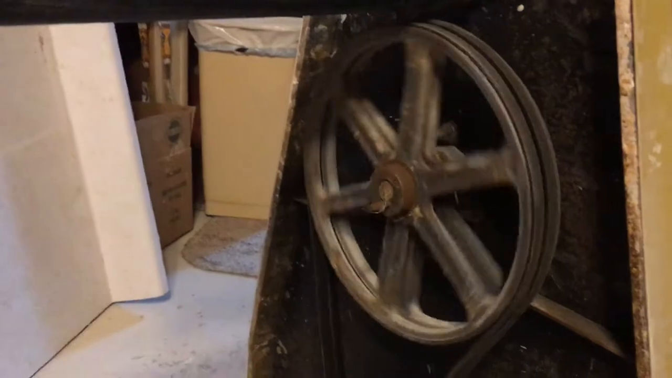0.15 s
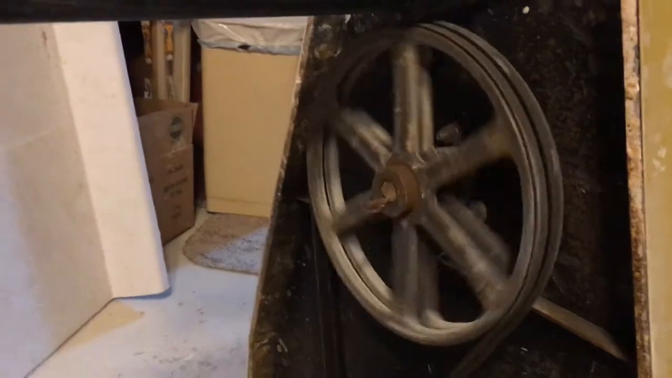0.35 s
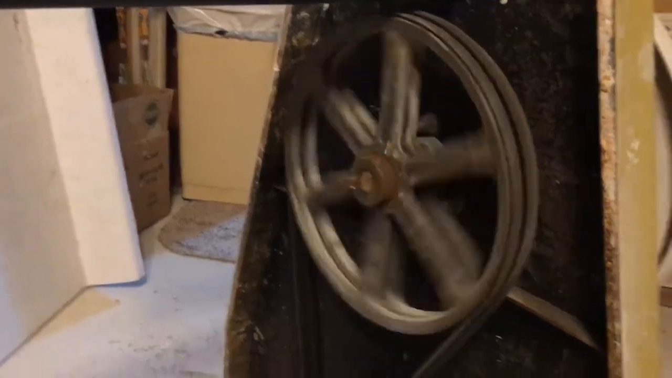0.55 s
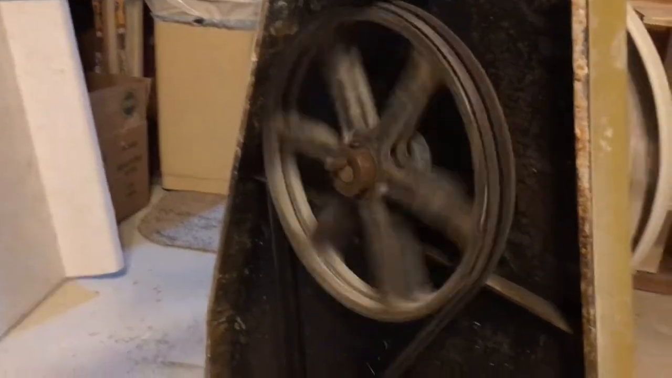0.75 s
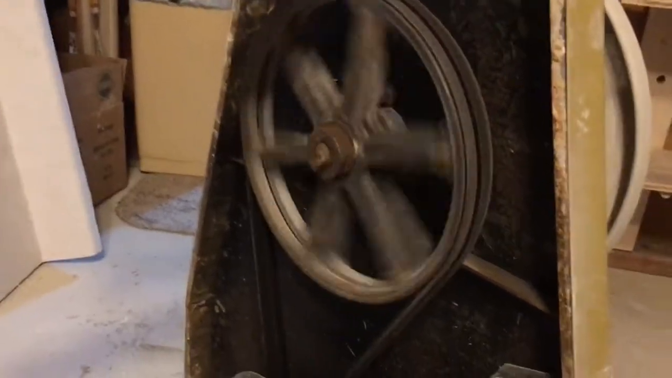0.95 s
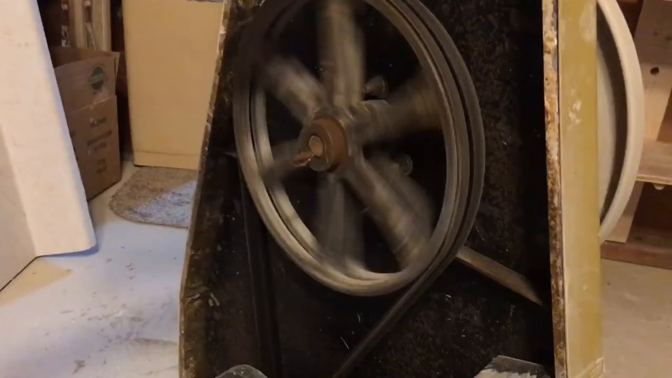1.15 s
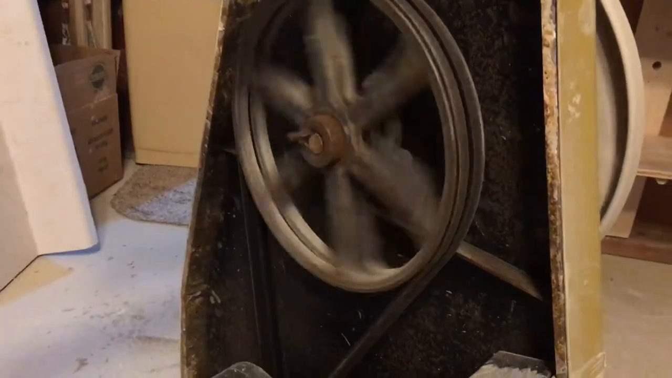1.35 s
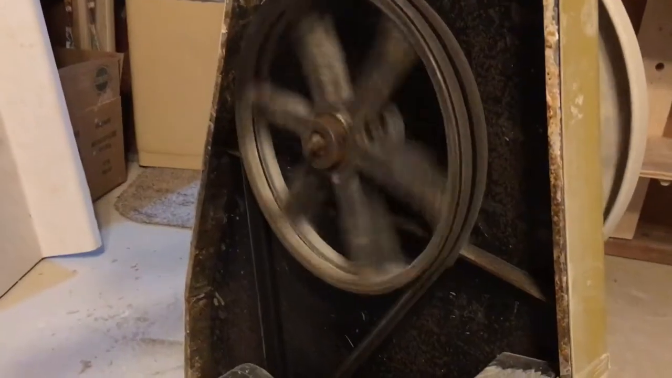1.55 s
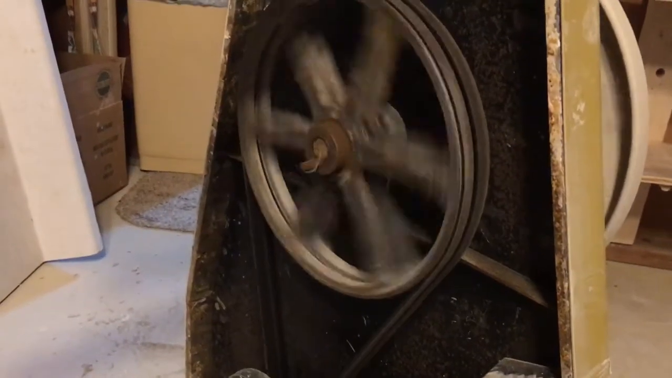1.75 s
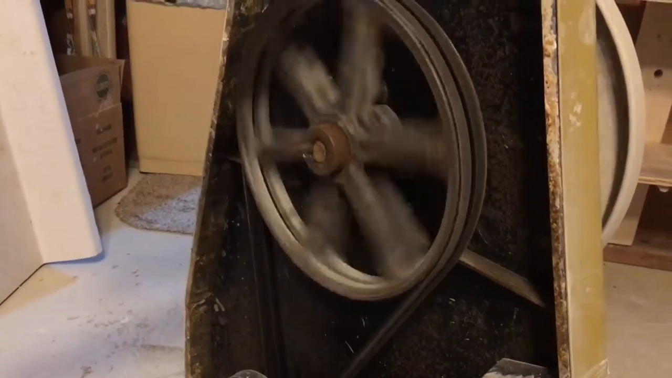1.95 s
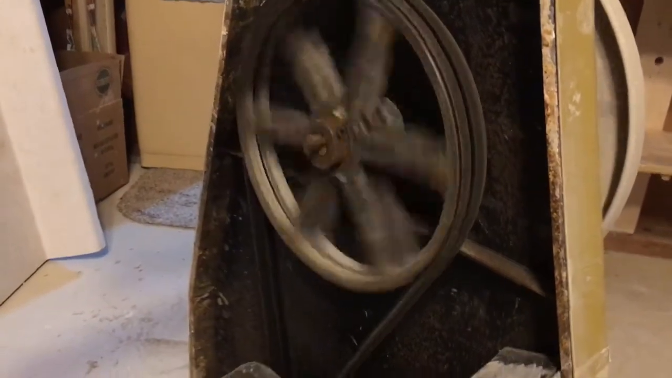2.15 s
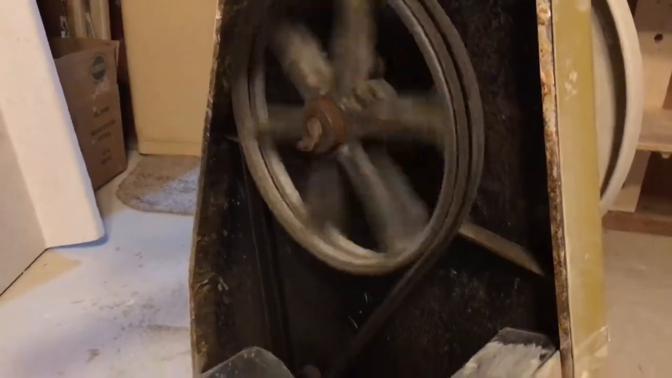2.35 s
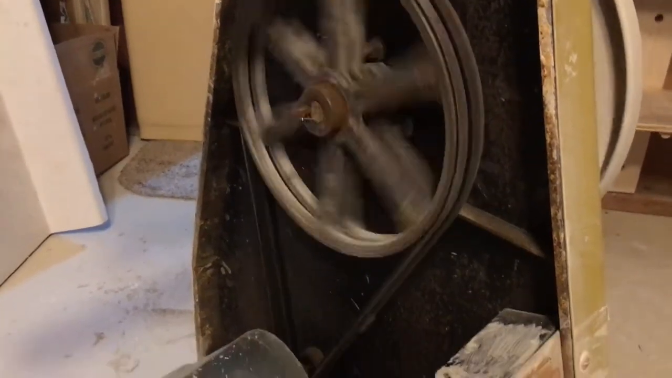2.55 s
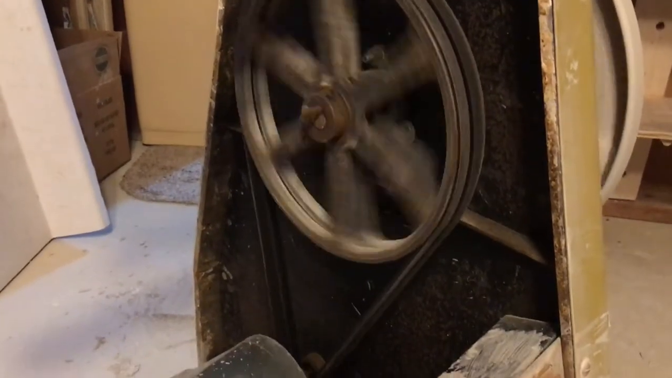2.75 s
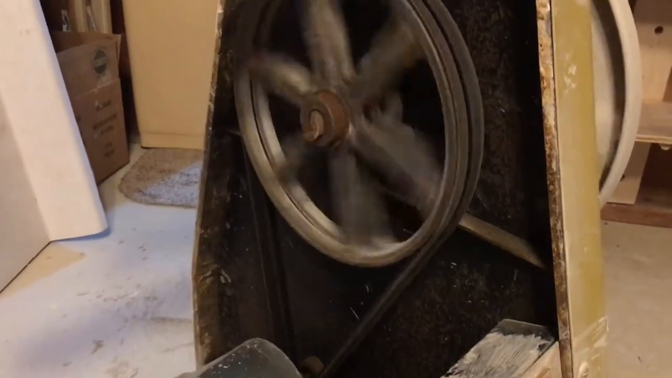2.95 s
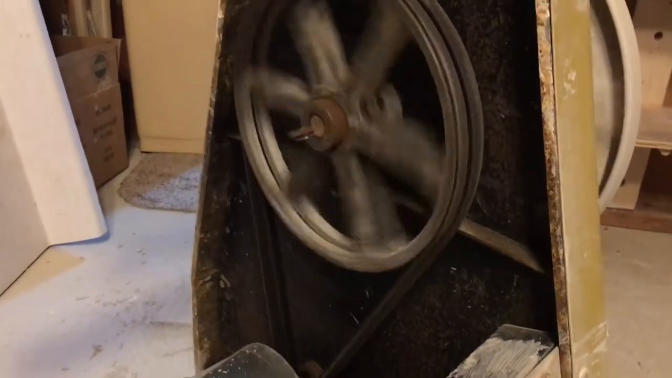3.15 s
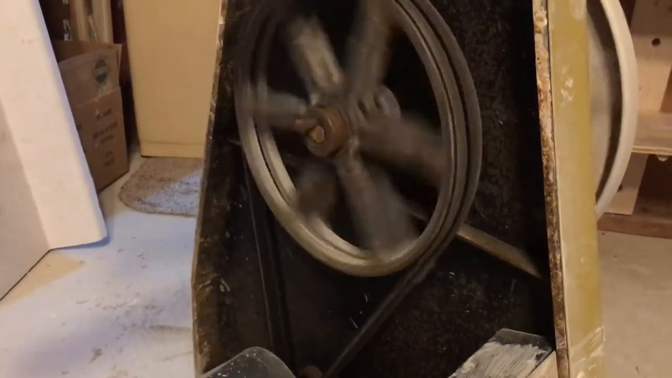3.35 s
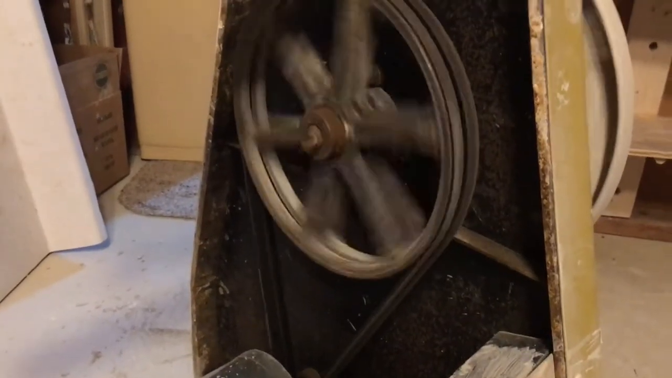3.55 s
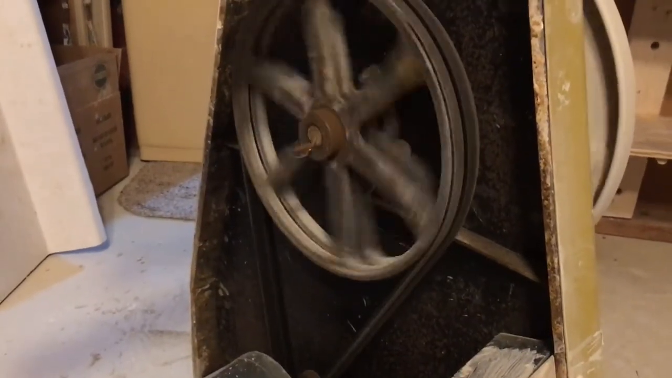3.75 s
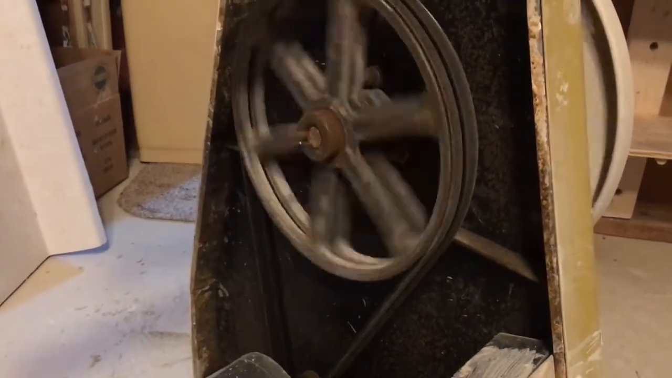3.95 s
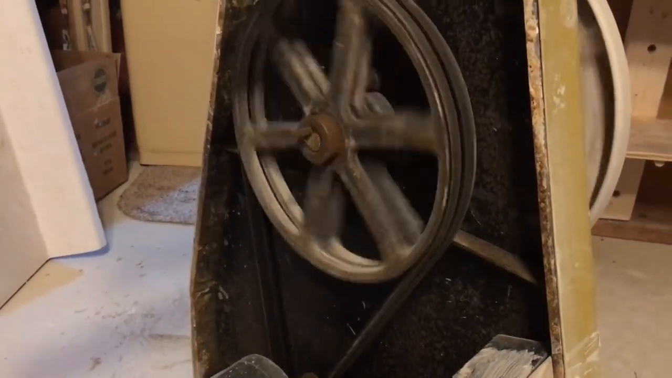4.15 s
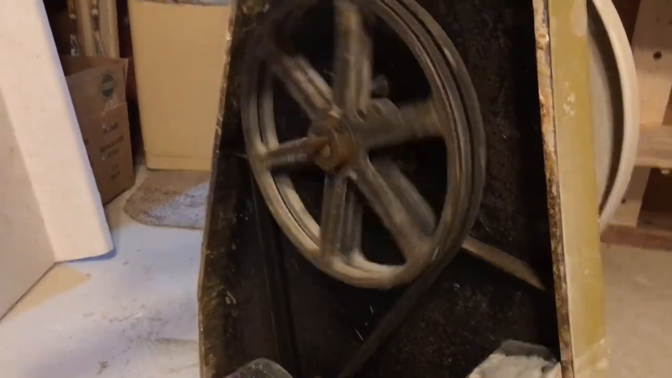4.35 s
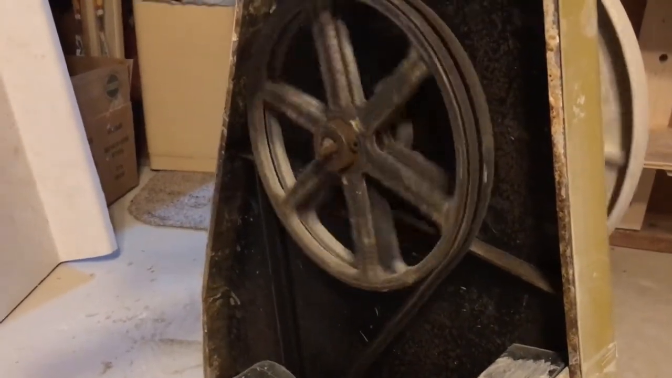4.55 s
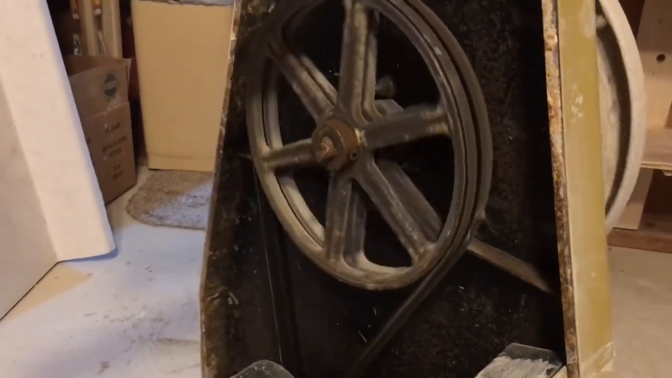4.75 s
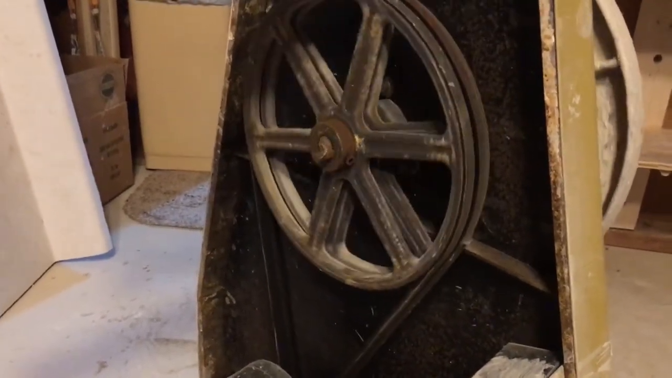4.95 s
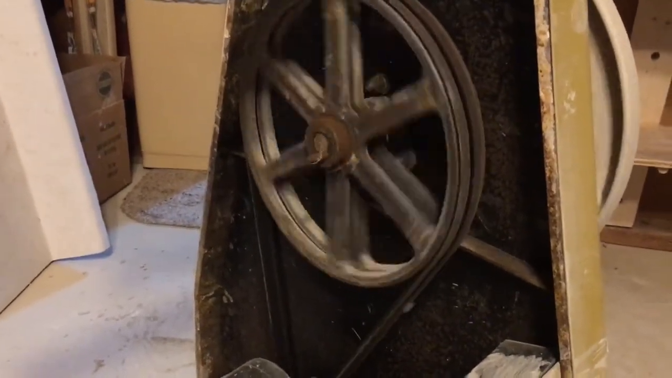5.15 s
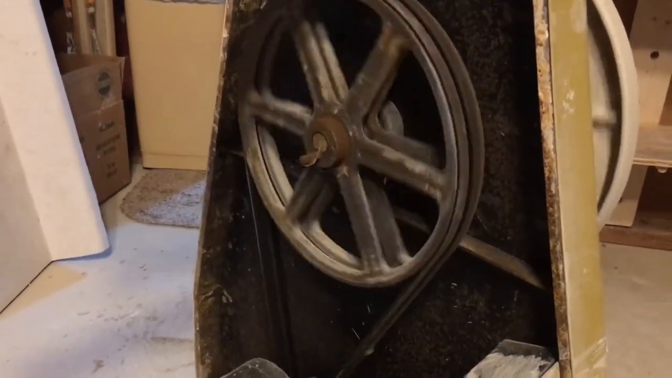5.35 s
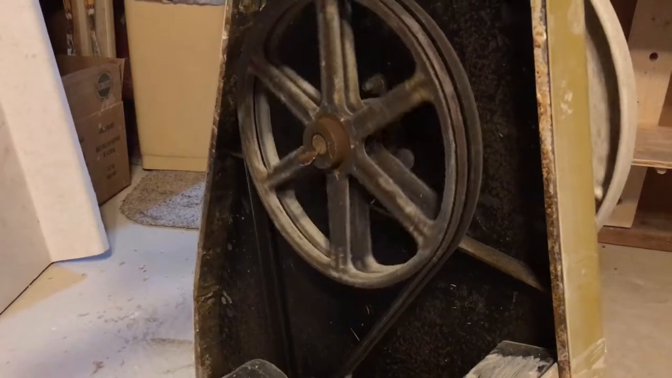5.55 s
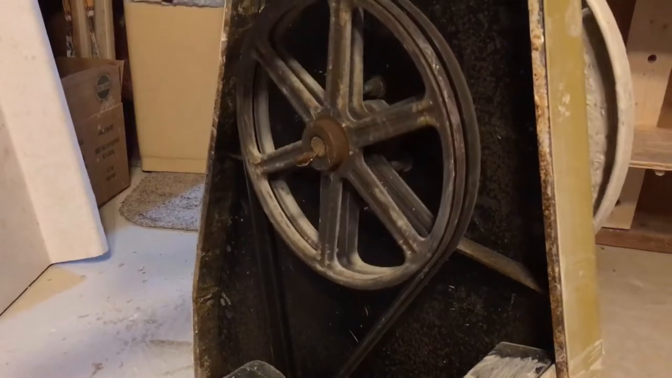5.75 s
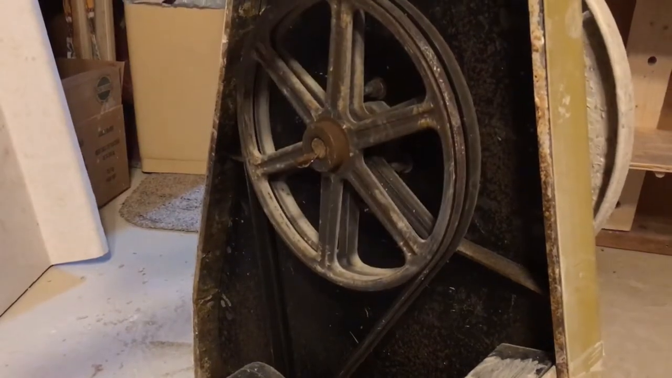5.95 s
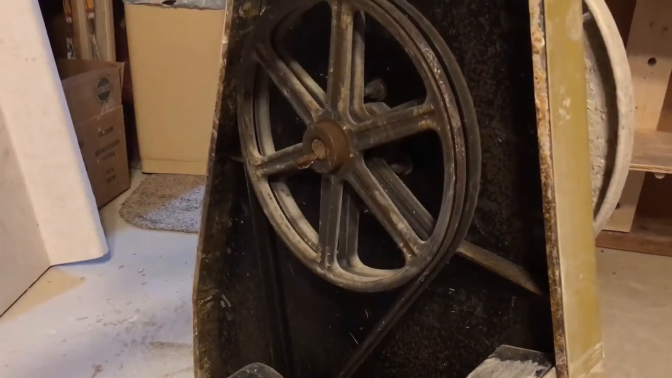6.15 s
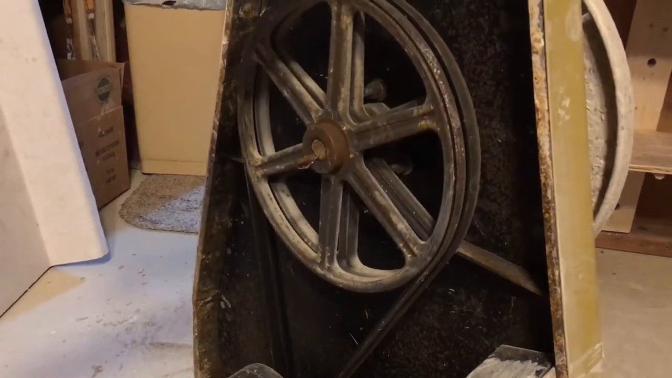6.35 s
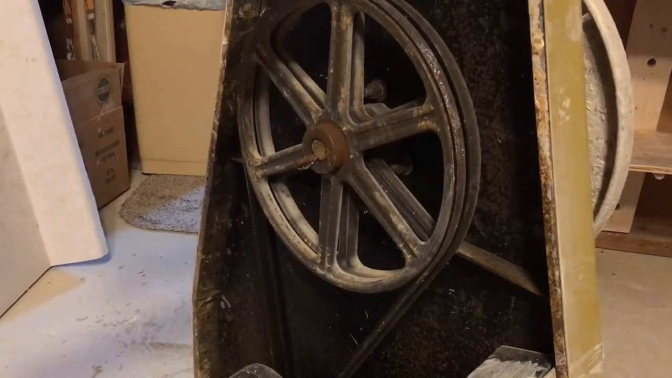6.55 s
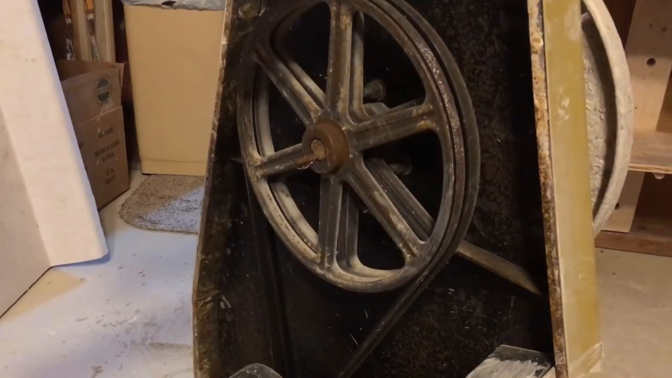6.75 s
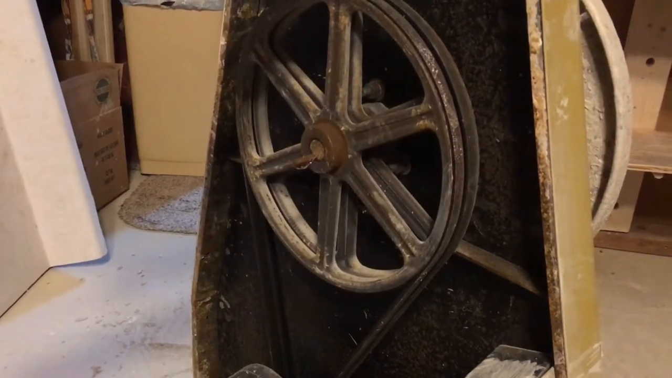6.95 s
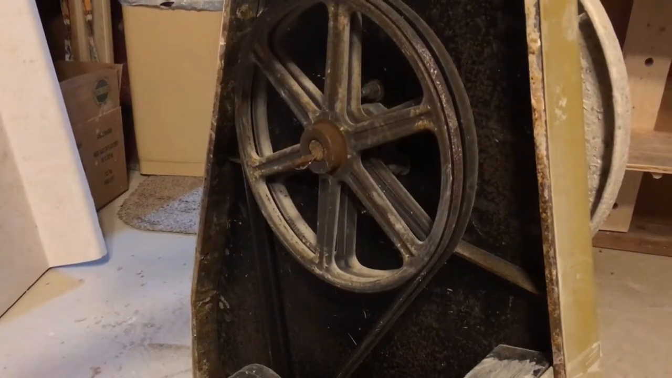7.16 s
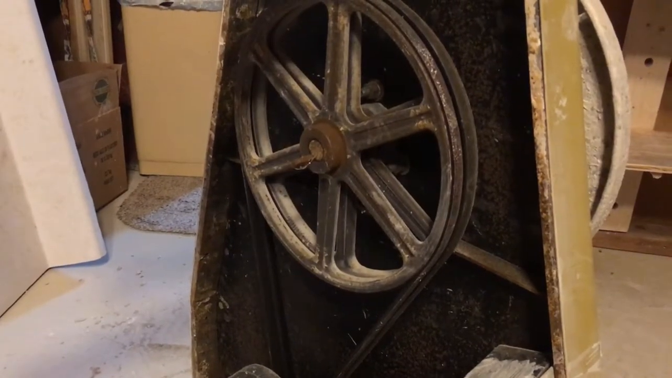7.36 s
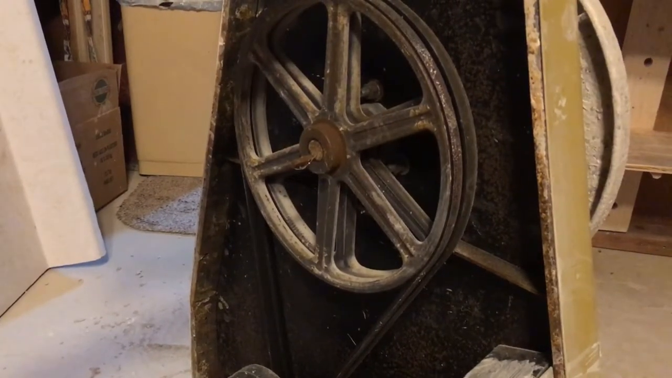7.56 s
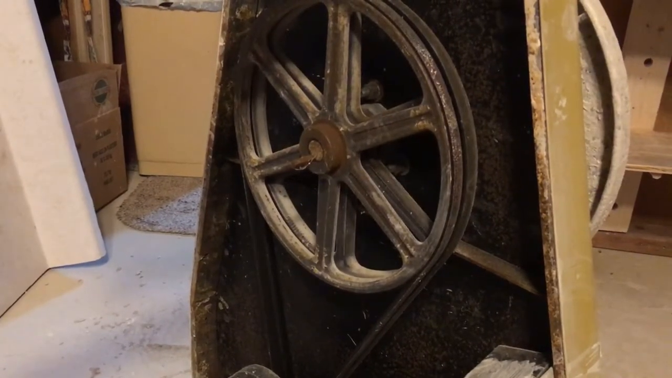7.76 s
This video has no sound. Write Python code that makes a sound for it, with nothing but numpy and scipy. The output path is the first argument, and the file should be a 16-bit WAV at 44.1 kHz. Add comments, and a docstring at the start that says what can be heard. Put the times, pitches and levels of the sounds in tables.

```python
"""The belt drive of a pottery wheel, close to a single microphone in a small workshop.
The motor hums on the mains and runs up; its shaft whines, its bearings rattle, and the rubber belt
chirps, squeaks and swishes once a wheel turn. The power is cut and the drive coasts to rest.
A lever twice slams against the steel frame and sets it ringing, with light taps of the linkage between.
Behind it all lies the room tone, a low rumble of ventilation."""
import sys
import numpy as np
from scipy import signal
from scipy.fft import rfft, irfft, next_fast_len
from scipy.io import wavfile

SR = 44100
rng = np.random.default_rng(int(sys.argv[2]) if len(sys.argv) > 2 else 0)


def wrap_up_sound(samples):
    """Save the sound to the file named by the first command line argument, as 16-bit audio."""
    columns = np.atleast_2d(samples).T
    # keep every value between -1 and 1, then stretch to whole-number steps
    tamed = np.clip(columns, -1, 1)
    steps = np.round(tamed * 32767).astype(np.int16)
    wavfile.write(sys.argv[1], SR, steps)


N = 347949
TIME = np.arange(N) / SR

# Room tone of the workshop. Each row: frequency in Hz, relative level in dB.
ROOM_SPECTRUM = [(30, -15), (42, -9), (51, -7), (62, -3.5), (85, -11.5), (125, -8), (174, -16.5),
                 (260, -15), (290, -27), (376, -21.5), (496, -33.5), (1040, -39.5), (4000, -55),
                 (16000, -62.5)]
# Light taps of the linkage. Each row: start in seconds, thump level in dB, tick level in dB.
LINKAGE_TAPS = [(5.19, -36, -65), (5.748, -42.5, -78), (7.078, -48, -78), (7.249, -41.5, -57),
                (7.7, -42.5, -66.5)]
# Low, damped resonances of the frame. Each row: centre in Hz, width in Hz, relative level in dB.
THUMP_MODES = [(366, 56, 4.5), (590, 160, -13.5)]
# The lever hits the frame. Each row: start in seconds, then thud, clang and crack strength in dB.
LEVER_CONTACTS = [(5.0638, -21.5, -13, -14), (5.072, -16.5, -11.5, -45), (5.078, -22.5, -15, -27),
                  (5.092, -21.5, -29.5, -25), (5.11, -32, -22, -35), (7.846, -27, -33, -27.5),
                  (7.857, -19, -20, -41.5), (7.863, -30, -35, -28), (7.88, -22.5, -22, -42)]
# Modes of the steel frame. Each row: frequency in Hz, relative level in dB, seconds to fall 60 dB.
FRAME_MODES = [(78, -7.5, 0.51), (112, -7, 0.34), (200.4, -13, 0.47), (275.4, -16.5, 0.24),
               (337.6, -2.5, 0.31), (401.5, 4, 0.29), (457, 4.5, 0.16), (628, -20, .3), (812, -7.5, 0.17),
               (884, -14, 0.4), (1205, -21.5, 0.28), (1510, -4, 0.22), (1549, 2.5, 0.22), (1595, 1, .18),
               (1726, -8, 0.26), (1755, -8.5, 0.33), (1927, -12.5, .18), (2118, -6.5, 0.22),
               (2216, -16, .22), (2697, -8.5, 0.19), (3009, -10.5, 0.15), (3560, -8.5, .14),
               (3650, -12, 0.19), (3790, -17, .17), (4102, -22.5, 0.28), (4430, -24, 0.15),
               (4620, -23, 0.25), (4872, -22.5, 0.18), (5524, -11.5, 0.09), (8090, -14.5, 0.11)]
# Dense ring of sheet metal and room. Each row: frequency in Hz, band gain in dB, seconds to fall 60 dB.
CLATTER_BANDS = [(75, -15, 0.35), (150.9, -22, 0.71), (410, -18.5, 0.48), (710, -21, 0.34),
                 (1050, -26, 0.19), (1664, -10.5, 0.24), (2382, -23, .24), (3640, -14, 0.18),
                 (4490, -21.5, .22), (5380, -18, 0.23), (7000, -29.5, 0.15), (8300, -21.5, .17),
                 (10600, -28.5, 0.15), (15000, -34, .14)]
# Resonances of the belt's chirp. Each row: centre in Hz, width in Hz, relative level in dB.
CHIRP_MODES = [(1780, 53, 9.5), (2010, 89, -2), (2090, 93, 2)]
# The belt peels loudly from its groove. Each row: start in seconds, relative level in dB.
LOUD_PEELS = [(0.3286, -39.5), (0.7053, -36.5), (1.6995, -35), (2.3191, -37), (2.589, -35), (3.2211, -35),
              (3.503, -39), (4.3784, -50), (5.841, -52)]
# Rubber rubbing on iron. Each row: frequency in Hz, relative level in dB.
RUB_SPECTRUM = [(1000, 2), (2000, 0.5), (4200, 2), (4900, -1.5), (6600, 0.5), (7100, -4.5), (9900, 4.5),
                (10400, -16.5), (11500, -3.5), (13300, -4), (15800, -12)]
# Resonances of the iron pulley. Each row: centre in Hz, width in Hz, relative level in dB.
PULLEY_MODES = [(4380, 150, 0), (5400, 320, 0), (6110, 200, -1.5), (6596, 150, 5), (7550, 350, -3.5),
                (8630, 380, -11), (9440, 670, -2.5), (11530, 620, 2), (14840, 110, -6.5)]
# The motor shaft runs up and coasts down. Each row: time in seconds, speed in turns per second.
SHAFT_SPEED = [(0, 9), (.3, 12.5), (.5, 18), (.7, 23.5), (1.0, 26.5), (1.3, 27.7), (2.0, 28.5),
               (3.56, 28.8), (3.65, 27.6), (3.8, 25), (3.9, 23.3), (4.08, 20), (4.43, 15.6), (5.0, 9),
               (5.85, .5)]
# Whine of the shaft. Each row: multiple of the shaft speed, relative level in dB.
SHAFT_TONES = [(15, 6), (20, -12.5), (22, -10.5), (23, -4.5), (24, 1.5), (30, -10.5), (32, -8.5), (39, -4)]
# The mount's response to the shaft tones. Each row: frequency in Hz, gain in dB.
MOUNT_RESPONSE = [(200, -34.5), (300, -21), (350, -5), (375, 1.5), (405, -18.5), (500, -36), (570, -12),
                  (615, -7.5), (700, -17.5), (790, -5), (920, -10), (1100, -31)]
# Resonances of mount, housing and bearings. Each row: centre in Hz, width in Hz, relative level in dB.
MOUNT_MODES = [(459, 22, -5), (580, 33, 2), (616.2, 20, 6), (688, 45, -6.5), (770, 65, -10),
               (903, 61, -17.5), (1214, 29, -13.5)]
HOUSING_MODES = [(1221.6, 69, -1), (1380, 110, -4.5), (1539, 44, 2.5)]
BEARING_MODES = [(2092, 79, -16), (2294, 62, -12.5), (2716, 27, -11.5), (2980, 42, -2), (3067, 110, -4),
                 (3353, 130, -4.5), (3488, 94, -6.5), (3875, 49, -11.5)]
# Broad rumble of the machine's body. Each row: frequency in Hz, relative level in dB.
BODY_SPECTRUM = [(40, -9.0), (65, 8.5), (100, -1), (200, 1.5), (280, -1), (440, 1.5), (510, -10),
                 (750, -1), (1000, -17.0), (1400, -10.5), (2200, -40.0)]
# Magnetic hum of the motor. Each row: multiple of the mains frequency, relative level in dB.
HUM_HARMONICS = [(2, -16.5), (3, -1.5), (4, -6.5), (5, -4.5), (6, 1), (7, -16.5), (8, -17), (9, -25.5),
                 (10, -29), (11, -27), (13, -25.5), (14, -26.5), (15, -32), (18, -34.5), (19, -41),
                 (20, -35.5)]

MAINS_HZ, POWER_OFF_S = 60, 3.555


def from_db(db):
    """Decibels to gain."""
    return 10 ** (np.asarray(db) / 20)


def unit_rms(x):
    """Scale to unit power."""
    return x / np.sqrt(np.mean(x ** 2) + 1e-20)


def at_hz(table, hz):
    """Columns of a table read on a log-frequency axis."""
    frequencies, *columns = np.transpose(table)
    return [np.interp(np.log(hz + 1e-9), np.log(frequencies), column) for column in columns]


def white():
    """White noise."""
    return rng.standard_normal(N)


def drift(rate_hz):
    """A random wander of spread 1, mostly slower than the given rate."""
    size = next_fast_len(N // 20 + 2)
    hz = np.arange(size // 2 + 1) * SR / 20 / size
    slow = irfft(rfft(rng.standard_normal(size)) / (1 + (hz / rate_hz) ** 2), size)
    return np.interp(np.arange(N) / 20, np.arange(size), unit_rms(slow))


def coloured(x, spectrum):
    """Give a sound a broad spectrum, at unit power."""
    size = next_fast_len(N)
    hz = np.arange(size // 2 + 1) * SR / size
    return unit_rms(irfft(rfft(x, size) * from_db(at_hz(spectrum, hz)[0]), size)[:N])


def resonate(x, modes):
    """Parallel resonances, each applied twice for steep skirts; the sum has unit power."""
    out = 0
    for hz, width, db in modes:
        r = np.exp(-np.pi * width * np.sqrt(2) / SR)
        section = [(1 - r * r) / 2, 0, (r * r - 1) / 2, 1, -2 * r * np.cos(2 * np.pi * hz / SR), r * r]
        out = out + from_db(db) * signal.sosfilt([section, section], x)
    return unit_rms(out)


def ring(clicks, hz, t60):
    """A unit click sets a sine of height 1 ringing."""
    r, w = np.exp(-np.log(1000) / (t60 * SR)), 2 * np.pi * hz / SR
    return signal.lfilter([0, np.sin(w)], [1, -2 * r * np.cos(w), r * r], clicks + 1e-18)


def fade(start_s, t60, rise_s):
    """Silence until the start, then a rounded rise and a decay."""
    age = np.clip(TIME - start_s, 0, 2 * t60)
    return (1 - np.exp(-age / rise_s)) * np.exp(-np.log(1000) * age / t60)


def throb(turns, depth_db):
    """A swell once a turn."""
    return unit_rms(from_db(depth_db * np.cos(2 * np.pi * turns)))


def once_every(turns, first, period, width):
    """A recurring swell of height 1; first peak, period and half width are in shaft turns."""
    away = (turns - first + period / 2) % period - period / 2
    return np.exp(-(away / width) ** 2)


def rolling(turns, pace, repeat):
    """The same rough track is rolled over on every turn, mixed with fresh grit."""
    track = rng.standard_normal(1500)
    place = np.arange(len(track)) / len(track)
    repeating = np.interp(turns % 1, place, track) * np.sqrt(pace)
    return np.sqrt(repeat) * unit_rms(repeating) + np.sqrt(1 - repeat) * white()


def room_tone(rumble_db=-47, drone_db=-50, fan_db=-52.5, fan_hz=41.5):
    """Ventilation rumbles in the background, with a deep fan tone and a drone at twice the mains rate."""
    drone = np.sqrt(2) * np.sin(2 * np.pi * 2 * MAINS_HZ * TIME + 0.45 * drift(2.6))
    drone *= 1 + 0.1 * drift(4.8)
    fan = np.sqrt(2) * np.sin(2 * np.pi * fan_hz * TIME + 0.34 * drift(2))
    rumble = coloured(white(), ROOM_SPECTRUM)
    return from_db(rumble_db) * rumble + from_db(drone_db) * drone + from_db(fan_db) * fan


def linkage_taps():
    """Soft contacts wake the low, well damped part of the frame, each with a faint tick."""
    thump = sum(from_db(db + 4.5) * fade(s, t60=0.14, rise_s=0.0042) for s, db, _ in LINKAGE_TAPS)
    tick = sum(from_db(db) * fade(s, t60=0.06, rise_s=0.0004) for s, _, db in LINKAGE_TAPS)
    return thump * resonate(white(), THUMP_MODES) + tick * coloured(white(), RUB_SPECTRUM)


def sheet_metal(spacing_hz=50, wash_db=2.5):
    """The many small modes of thin panels, at chance pitches, over a wash of room sound."""
    size = next_fast_len(N)
    present = rng.random(size // 2 + 1) < SR / size / spacing_hz
    modes = irfft(present * np.exp(2j * np.pi * rng.random(len(present))), size)[:N]
    return unit_rms(modes) + from_db(wash_db) * white()


def lever_clicks(hz, thud_hz=450, clang_hz=1600, crack_hz=6000):
    """The lever's contacts as clicks, with the strength that they have at one frequency."""
    clicks = np.zeros(N)
    for start_s, *levels in LEVER_CONTACTS:
        db = np.interp(np.log(hz), np.log([thud_hz, clang_hz, crack_hz]), levels)
        clicks[min(round(start_s * SR), N - 1)] = from_db(db)
    return clicks


def lever_slams(modes_db=-2.5, crack_db=6.5, crack_t60=0.013):
    """Each contact rings the steel frame, over a short crack and a dense dying clatter."""
    out = from_db(modes_db) * sum((-1) ** k * from_db(db) * ring(lever_clicks(hz), hz, t60)
                                  for k, (hz, db, t60) in enumerate(FRAME_MODES))
    edges_hz = np.r_[50, 100, 180, np.geomspace(300, 17000, 18)]
    panels = sheet_metal(), sheet_metal()
    for k, (low, high) in enumerate(zip(edges_hz, edges_hz[1:])):
        hz = np.sqrt(low * high)
        db, tail_t60 = at_hz(CLATTER_BANDS, hz)
        energy = lever_clicks(hz) ** 2 + 1e-18
        tail, crack = (signal.lfilter([1], [1, -np.exp(-2 * np.log(1000) / (t60 * SR))], energy)
                       for t60 in (tail_t60, crack_t60))
        bandpass = signal.butter(3, [low, high], "band", fs=SR, output="sos")
        band = unit_rms(signal.sosfilt(bandpass, panels[k % 2]))
        out = out + from_db(db) * np.sqrt(tail + from_db(crack_db) ** 2 * crack) * band
    return out


def belt_chirps(turns, pace, full_speed_db=-50.5):
    """A rough place on the belt scrapes the frame once a lap, fainter at low speed."""
    envelope = once_every(turns, first=9.25, period=37.5, width=1)
    return from_db(full_speed_db + 13 * np.log2(pace)) * envelope * resonate(white(), CHIRP_MODES)


def squeak(scale_s, pitch_hz=6400, fall=0.08, lower_db=-7):
    """Rubber sticks and slips: a click, then a falling rough note with its octave."""
    age = np.arange(0, 4, 1 / (scale_s * SR))   # in units of scale_s
    hz = pitch_hz * rng.uniform(0.84, 1.14) * np.exp(-fall * age)
    phase = 2 * np.pi * np.cumsum(hz) / SR + 0.13 * np.cumsum(rng.standard_normal(len(age)))
    note = (np.sin(2 * phase) + from_db(lower_db) * np.sin(phase)) * age * np.exp(1 - age ** 2)
    click = np.diff(rng.standard_normal(len(age) + 1)) * np.exp(-2 * age)
    return (note + 0.45 * click) / np.sqrt(2)


def belt_peels(turns, swish, belt_db, grit_per_s=30, swish_grit_per_s=160):
    """The belt squeaks: a few loud peels, a slip on most shaft turns in a swish, and a fine grit."""
    new_turn = np.diff(np.floor(turns), prepend=0) > 0
    slips = np.flatnonzero(new_turn & (rng.random(N) < swish))
    grit_rate = (grit_per_s + swish_grit_per_s * swish) * (TIME < SHAFT_SPEED[-1][0])
    grit = np.flatnonzero(rng.random(N) < grit_rate / SR)
    events = ([(round(s * SR), db - 3.5) for s, db in LOUD_PEELS]
              + [(i, belt_db[i] + 10) for i in slips]
              + [(i, belt_db[i] + 1) for i in grit])
    out = np.zeros(N)
    for start, db in events:
        sound = squeak(scale_s=0.0046 * rng.uniform(0.68, 1.4))[:N - start]
        out[start:start + len(sound)] += from_db(db) * sound
    return out


def belt_rub(turns, pace, belt_db):
    """The belt rubs with a fine grain and sets the pulley singing; at low speed it catches unevenly."""
    catching_db = 3.5 * (1 - pace) * drift(10)
    rub = coloured(white() * from_db(1.4 * drift(300)), RUB_SPECTRUM)
    pulley = resonate(rolling(turns, pace, repeat=0.27), PULLEY_MODES)
    pulley_db = 0.91 * belt_db - 13 + catching_db
    return from_db(belt_db + 0.5 * catching_db) * rub + from_db(pulley_db) * pulley


def shaft_whine(turns, speed, pace, gain_db=-45.5, flutter=0.46):
    """Shaft tones swell as they glide through the mount's resonances."""
    out = 0
    for multiple, db in SHAFT_TONES:
        mount_db, = at_hz(MOUNT_RESPONSE, multiple * speed)
        gain = from_db(db + mount_db) * (1 + flutter / 2 * drift(10))
        phase = 2 * np.pi * (multiple * turns + rng.random()) + flutter * drift(7.8)
        out = out + gain * np.sqrt(2) * np.sin(phase)
    return from_db(gain_db + 10 * np.log2(pace)) * out


def motor_rattle(turns, pace, vigour, pull, rumble_db=-48.5, housing_db=-51, bearing_db=-52):
    """Rolling noise shakes mount, housing and bearings, each growing with the vigour by its own law."""
    # the mount is shaken on every turn, a little harder on every second one
    shaking = rolling(turns, pace, repeat=0.22) * throb(turns, 4) * throb(turns / 2, 2.3)
    mount = resonate(shaking, MOUNT_MODES)
    body = coloured(white(), BODY_SPECTRUM)
    # the housing sings the high shaft tones that fall on its resonance; they beat once a turn
    singing = sum(np.sin(2 * np.pi * k * turns + 0.6 * drift(12)) for k in (53, 54, 55))
    housing = resonate(white() * throb(turns, 1.1) + from_db(-26) * singing, HOUSING_MODES)
    # the balls pass a rough spot about two and a half times a turn
    rattle = throb(2.46 * turns, 3.3) * throb(turns, 2.2)
    bearing = resonate(rolling(turns, pace, repeat=0.14), BEARING_MODES) * rattle
    # the rumble holds even above a vigour of 0.57 and falls steeply below it
    rumble_gain = from_db(rumble_db + 5 * pull) / np.sqrt(1 + (0.57 / vigour) ** 13)
    return (rumble_gain * (mount + from_db(-0.5) * body)
            + from_db(housing_db + 19.5 * np.log2(vigour)) * housing
            + from_db(bearing_db + 21 * np.log2(vigour)) * bearing)


def motor_hum(slip, pull, main_harmonic=6, off_t60=0.058):
    """Mains harmonics swell as the motor pulls; the high buzz is harsher while the rotor lags."""
    low_buzz_db = -43.5 + 4.5 * pull
    main_db = -32.5 + 2.5 * pull - 5 * slip
    high_buzz_db = main_db + 7 * slip
    out = 0
    for k, db in HUM_HARMONICS:
        level_db = low_buzz_db if k < main_harmonic else main_db if k == main_harmonic else high_buzz_db
        waver = 0 if k == main_harmonic else 0.18
        phase = 2 * np.pi * (k * MAINS_HZ * TIME + rng.random()) + waver * drift(8)
        out = out + from_db(db + level_db) * (1 + waver * drift(2.6)) * np.sqrt(2) * np.sin(phase)
    return out * np.exp(-np.log(1000) * np.maximum(TIME - POWER_OFF_S, 0) / off_t60)


def scene(brake_on_s=5.12, brake_rise_s=0.13, rest_s=5.9):
    """What reaches the microphone: the drive up close, the lever and its linkage, the room behind."""
    speed = np.interp(TIME, *np.transpose(SHAFT_SPEED))
    turns = np.cumsum(speed) / SR
    pace = speed / speed.max()
    powered = TIME < POWER_OFF_S
    slip = powered * (1 - pace)
    # an induction motor pulls hardest part of the way up, here at 20.8 turns per second
    pull = powered * np.exp(-((speed - 20.8) / 4.7) ** 2)
    brake = np.clip((TIME - brake_on_s) / brake_rise_s, 0, 1)
    # vigour of the shaking is 1 at full speed; a lagging rotor and the dragging brake add to it
    vigour = pace + 0.28 * slip + 0.29 * brake
    swish = pace ** 2 * once_every(turns, first=11.6, period=25.6, width=4.5)   # once a wheel turn
    belt_db = -54 + 9 * np.log2(vigour) + 2.5 * swish
    moving = np.clip((rest_s - TIME) / 0.18, 0, 1)
    drive = moving * (motor_rattle(turns, pace, vigour, pull) + shaft_whine(turns, speed, pace)
                      + belt_rub(turns, pace, belt_db))
    mix = (drive + motor_hum(slip, pull) + belt_chirps(turns, pace) + lever_slams() + linkage_taps()
           + room_tone() + belt_peels(turns, swish, belt_db))
    return mix[None]


def record(dry, low_cut_hz=35, high_cut_hz=15800):
    """The mono microphone signal goes through a steep low cut and high cut."""
    dry = signal.sosfilt(signal.butter(8, low_cut_hz, "high", fs=SR, output="sos"), dry)
    return signal.sosfilt(signal.ellip(10, 0.1, 80, high_cut_hz, fs=SR, output="sos"), dry)


dry = scene()
out = record(dry)
wrap_up_sound(out)
```